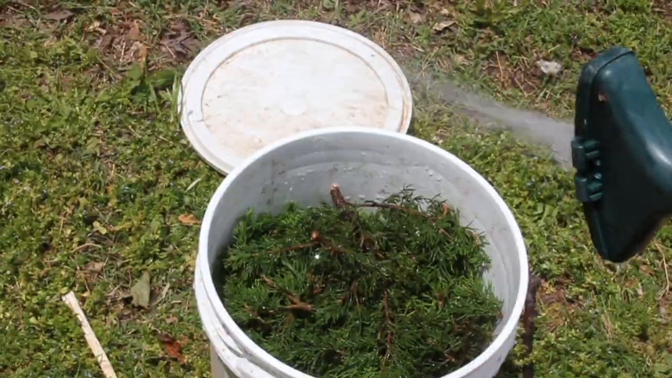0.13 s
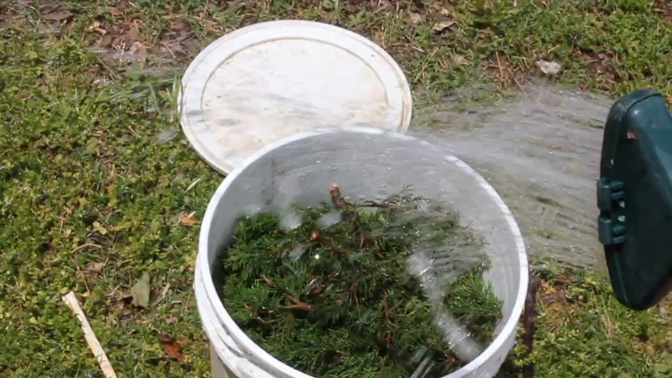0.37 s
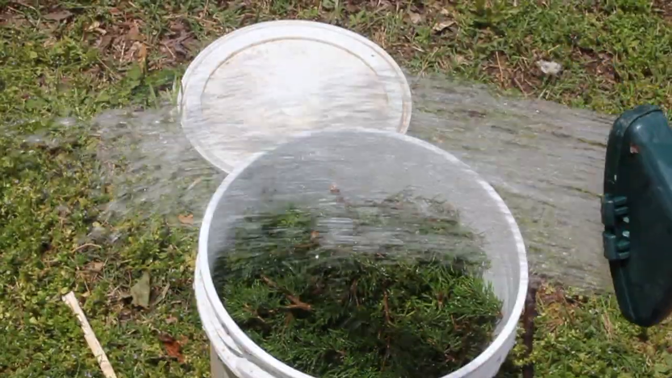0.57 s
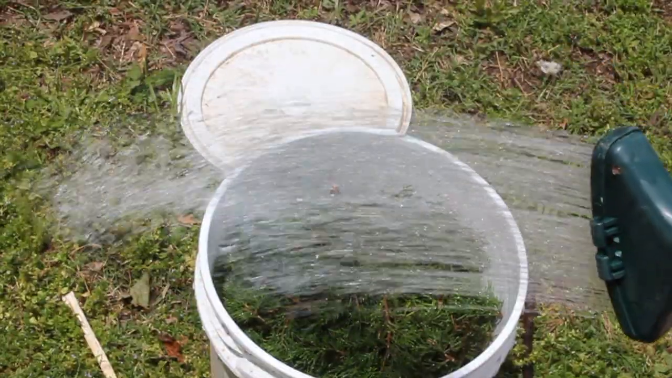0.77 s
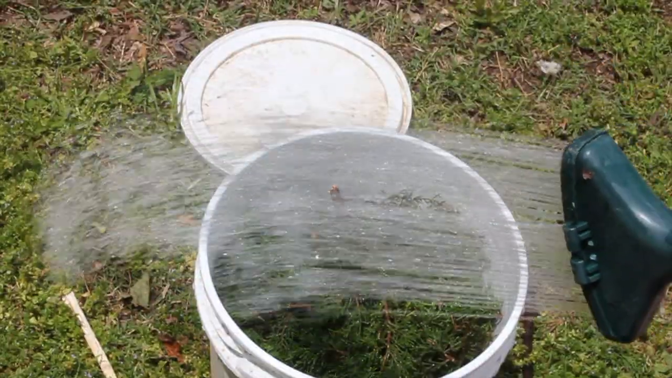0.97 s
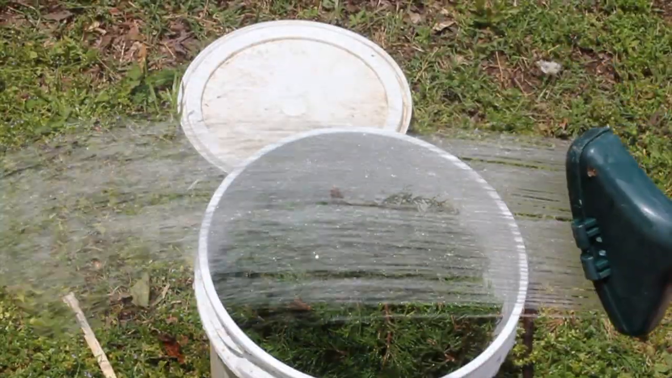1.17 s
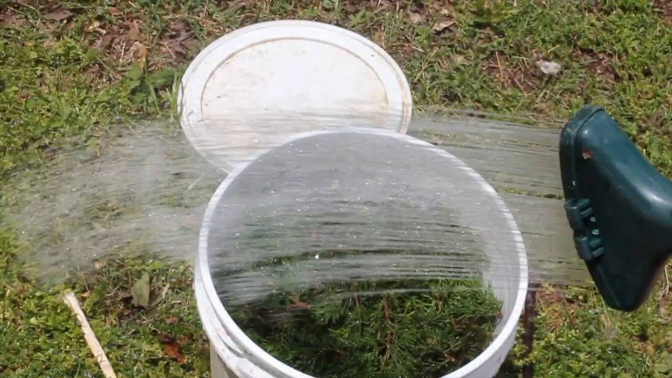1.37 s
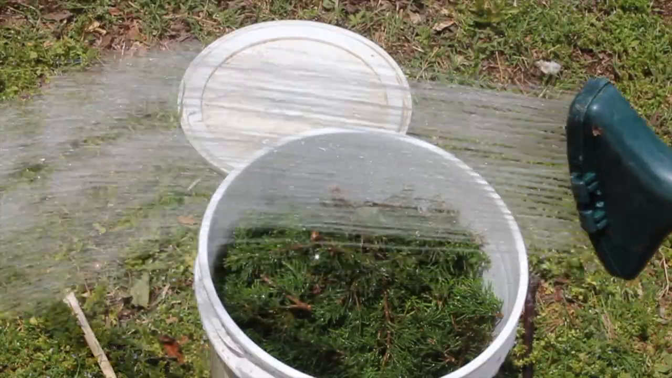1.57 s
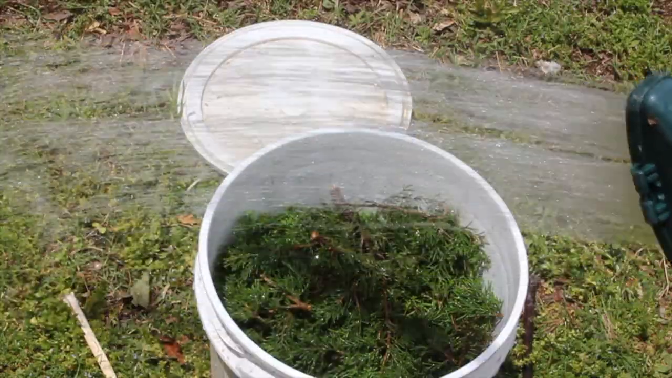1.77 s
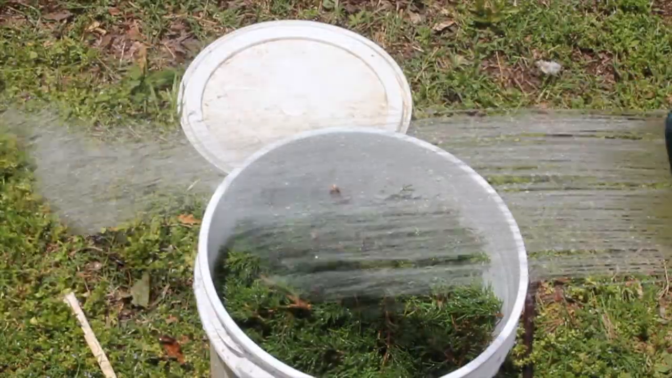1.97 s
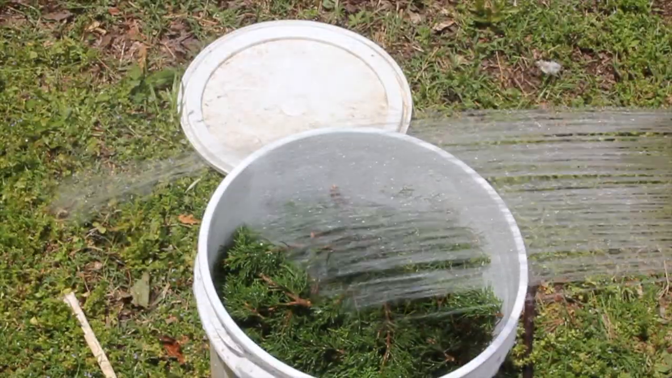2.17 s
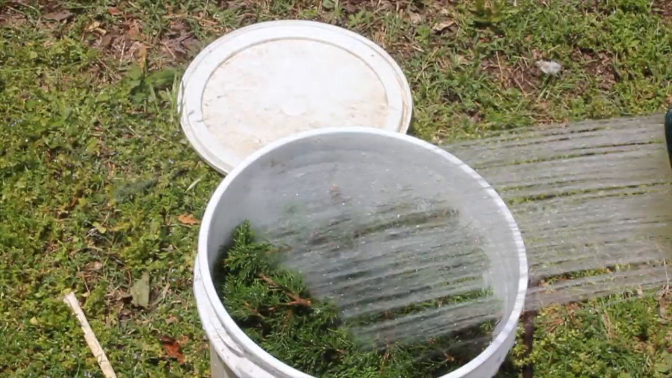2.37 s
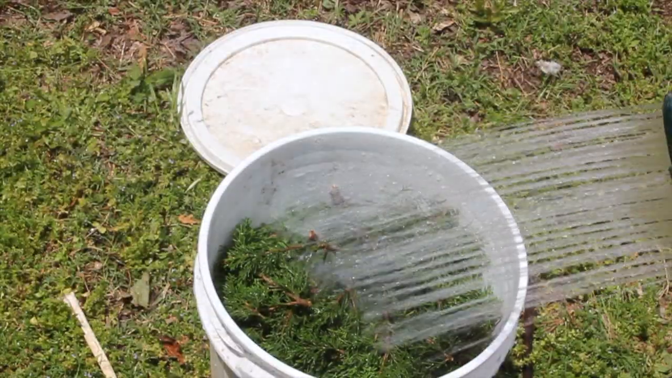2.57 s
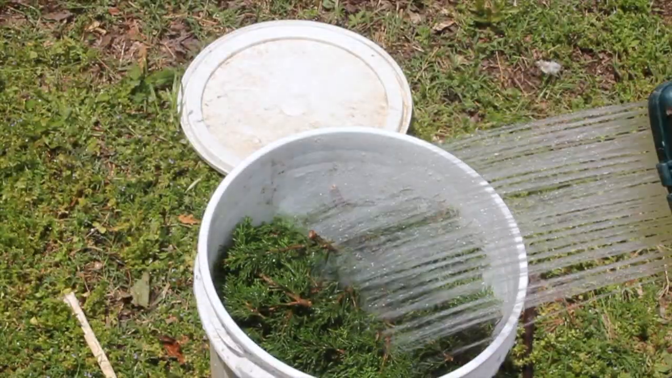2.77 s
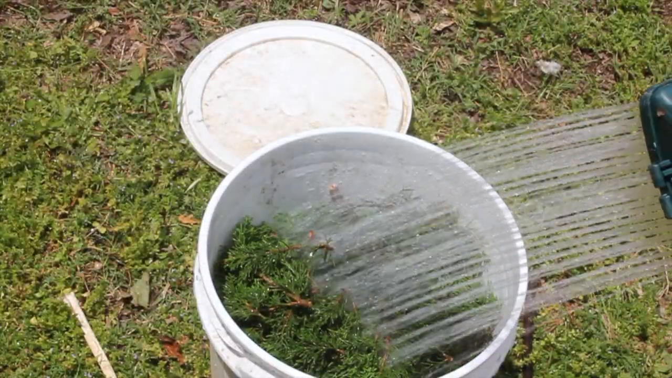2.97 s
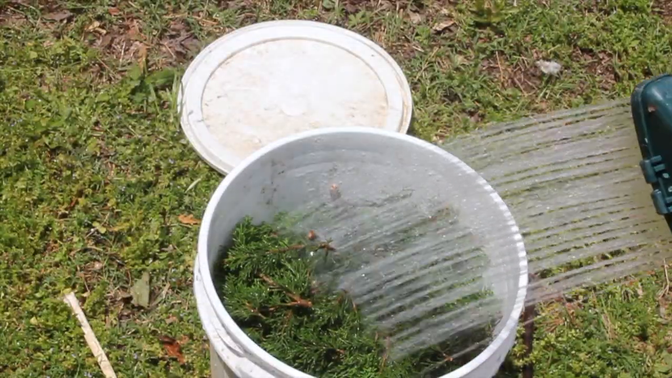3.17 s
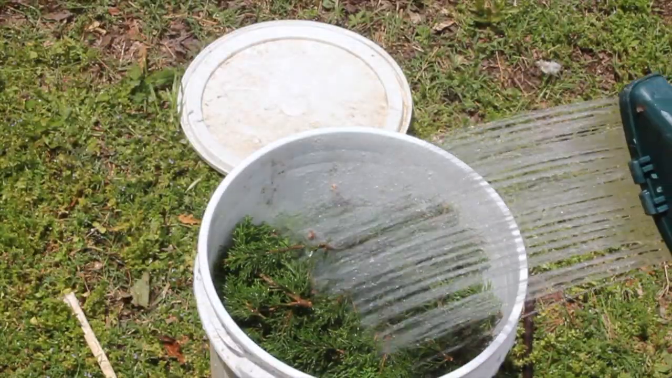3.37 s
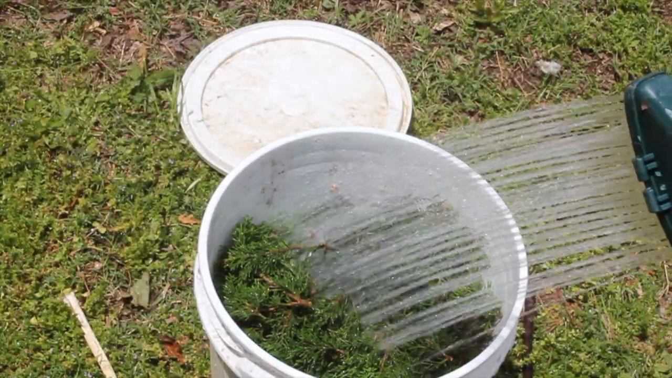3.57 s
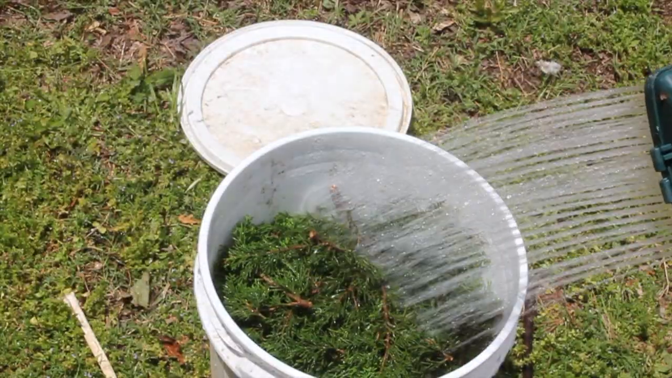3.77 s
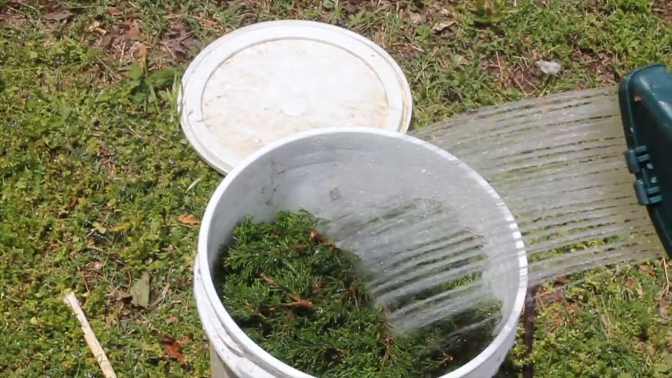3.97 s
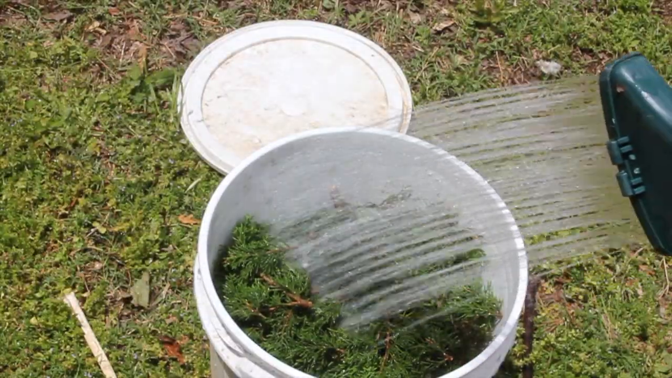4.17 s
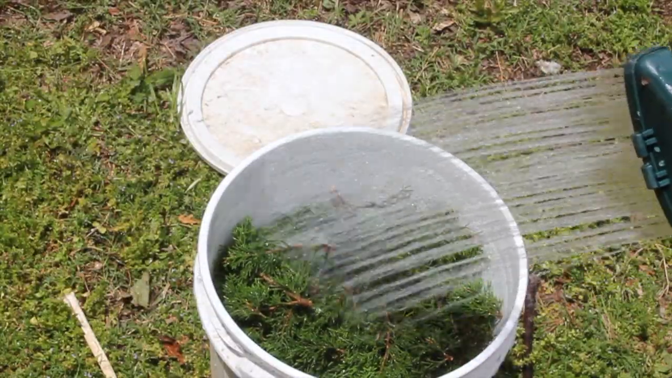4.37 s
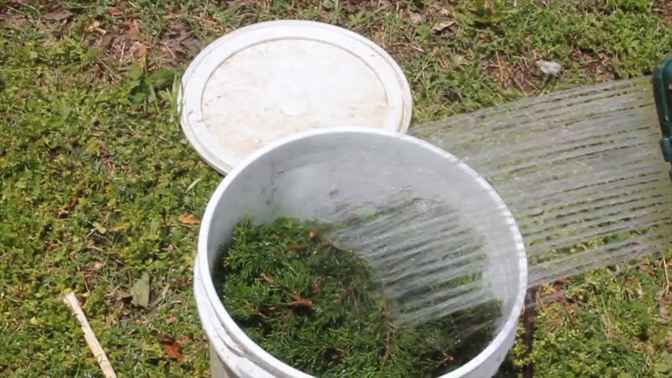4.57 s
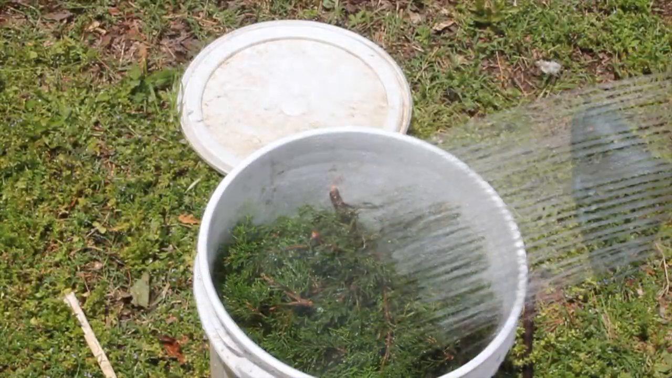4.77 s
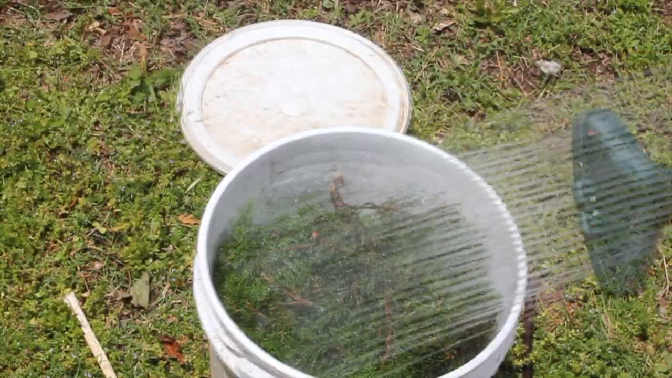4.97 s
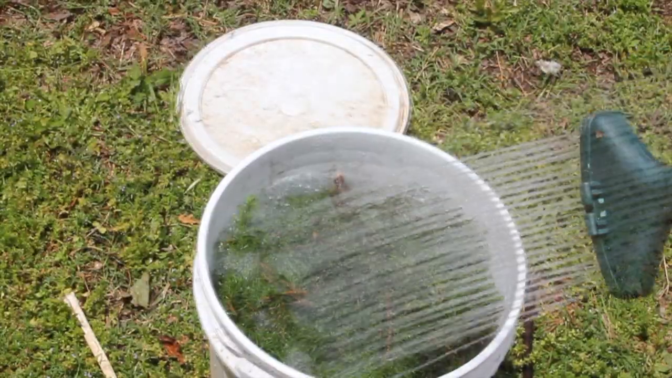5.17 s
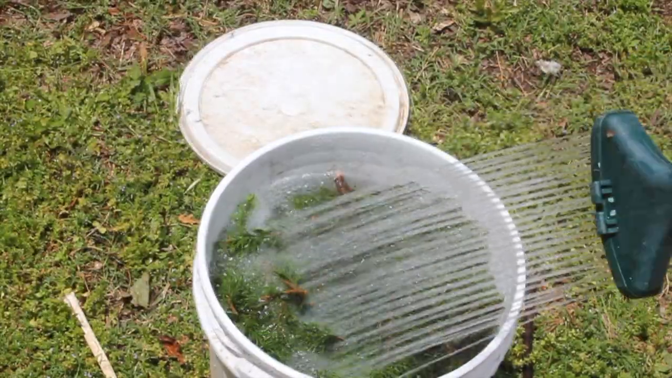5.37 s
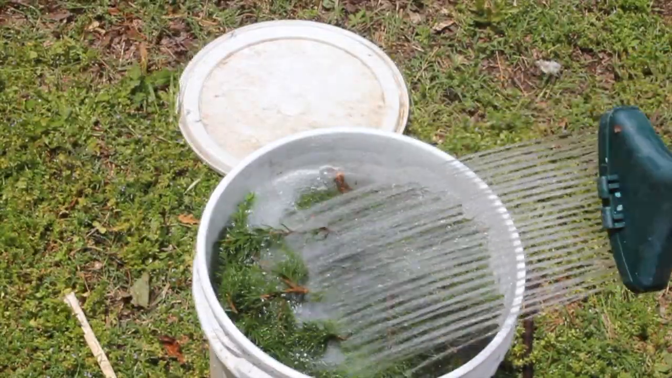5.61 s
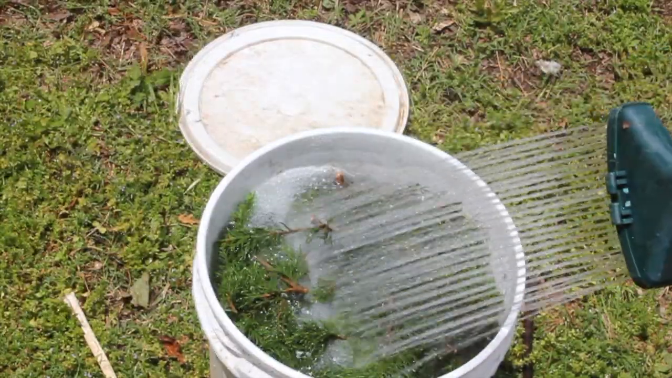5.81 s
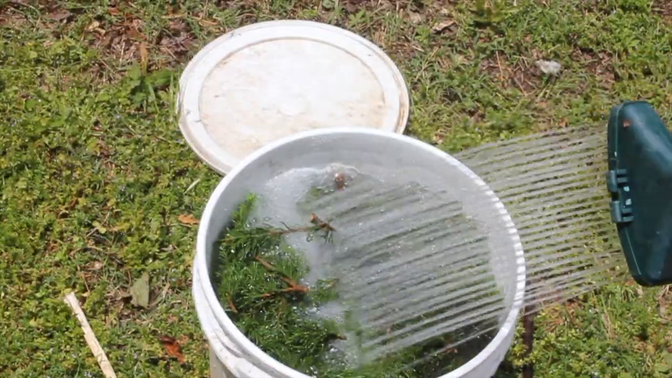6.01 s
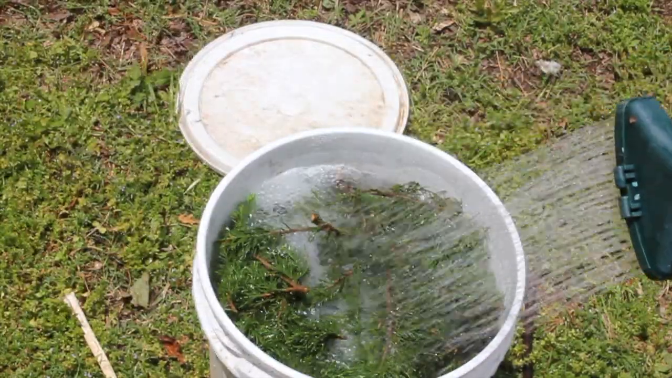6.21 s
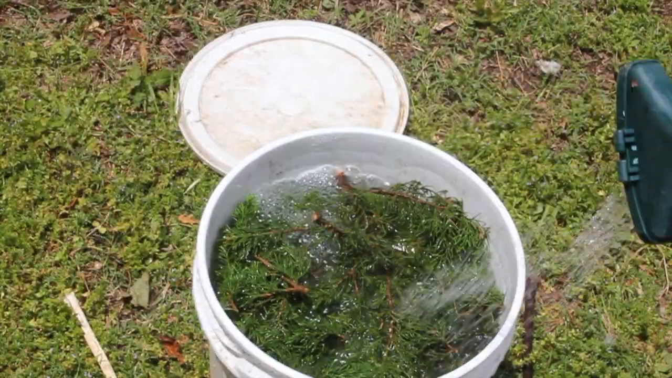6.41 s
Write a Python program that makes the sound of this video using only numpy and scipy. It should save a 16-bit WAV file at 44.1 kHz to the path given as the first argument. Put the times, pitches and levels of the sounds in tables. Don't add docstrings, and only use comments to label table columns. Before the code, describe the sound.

A hose nozzle spits open into a bright, sputtering shower that patters into a plastic bucket of leafy cuttings, then smooths and booms softly while filling.

```python
import sys
import numpy as np
from scipy import signal
from scipy.fft import rfft, irfft
from scipy.io import wavfile

SR = 44100
rng = np.random.default_rng(int(sys.argv[2]) if len(sys.argv) > 2 else 0)


def dump(signal):
    limited = np.clip(np.atleast_2d(signal).T, -1, 1)
    pcm = np.round(limited * 32767).astype(np.int16)
    wavfile.write(sys.argv[1], SR, pcm)


def gain_from_db(level_db):
    decades = np.asarray(level_db, float) / 20
    return 10 ** decades


N = 284312

# (time [s], level [dB])
SHOWER_FORCE = [(0.1, -23.5), (0.13, -30.5), (0.33, -25), (0.51, -24.5), (1.35, -26), (1.97, -30),
                (2.01, -26), (2.24, -20), (2.61, -29), (3.25, -30.5), (4.45, -23.5), (4.93, -31.5),
                (5.42, -24.5), (6.14, -27), (6.16, -24.5), (6.25, -34), (6.43, -37.5), (6.45, -45)]
# (time [s], level [dB])
TRAPPED_AIR = [(0.1, -33), (0.13, -27.5), (0.22, -33), (1.64, -29), (1.67, -32.5), (1.76, -29.5),
               (1.81, -32.5), (1.99, -40), (2.03, -34.5), (2.42, -31.5), (2.49, -37), (3.79, -37),
               (4.32, -34), (4.96, -36.5), (5.4, -32.5), (6.13, -34.5), (6.43, -40), (6.45, -47)]
# (time [s], level [dB])
AIM_AT_PLASTIC = [(0.1, -34), (0.13, -28.5), (0.2, -30), (1.25, -32), (1.88, -36), (2.2, -35.5),
                  (3.1, -38.5), (4.59, -37.5), (4.68, -38.5), (5.01, -38), (5.47, -34), (6.14, -31.5),
                  (6.23, -35), (6.45, -35)]
# (time [s], level [dB])
PLUNGE_IN_WATER = [(0.0, -31.5), (0.03, -34), (1.38, -35), (1.52, -36.5), (2.94, -34.5), (3.16, -38.5),
                   (4.15, -35), (4.87, -37.5), (5.22, -32.5), (6.27, -31.5), (6.28, -30), (6.45, -32.5)]

# (time [s], length [s], gain [dB], below 0 chokes and
AIR_CHOKES = [(0.327, 0.057, -5.5, 0.7), (0.912, 0.0088, -10, 0.5), (1.186, 0.0069, -11, 0.6),
              (1.379, .016, -11, .3), (1.448, 0.013, -10, .4), (1.474, 0.014, -10, .1),
              (1.527, .004, -7, .7), (1.547, .009, -10, .4), (1.66, 0.018, -13, .3),
              (1.68, 0.006, -16, 0.2), (1.703, .012, -5, 0.3), (1.791, 0.012, -16, 0.5),
              (1.816, 0.013, -11.5, 0.2), (1.839, 0.0063, -16, 0.2), (1.874, .01, -13, 0.45),
              (1.946, .016, -9, 0.4), (1.985, .02, -3, .8), (2.142, 0.017, -4, 0.3), (2.474, .016, -5, .1),
              (2.559, 0.0085, 10, 0.1), (2.666, 0.023, -7, 0.3), (3.99, 0.022, -2.5, .9),
              (1.714, 0.014, -4, .1), (0.587, 0.068, -4.5, 0.3), (1.42, .02, -3, .1),
              (4.073, 0.036, -2.5, 1), (4.7, .04, -6, 0), (2.002, .015, -7, .1), (2.378, .008, -6, .1),
              (1.216, .02, -2, .1), (1.132, .015, -4, .7), (5.005, .03, 0, .1), (2.74, .04, 0, .1),
              (6.25, .045, -2.5, .3)]
# (time [s], length [s], height [dB], share of air
WATER_BURSTS = [(0.388, 0.011, 4.5, 0.24), (0.984, 0.0062, 6, 0.9), (1.099, 0.03, 4, 0.5),
                (1.391, 0.015, 5.5, .6), (1.461, 0.011, 8, 0.67), (1.518, 0.014, 4, 1),
                (1.567, .013, 7.5, 0.63), (1.603, 0.022, 4.5, 0.8), (1.647, 0.01, 4, 1),
                (2.02, 0.0072, 11, 0.66), (1.758, 0.0075, 5, 0.4), (1.774, 0.016, 4, 0.47),
                (1.8, 0.0078, 9, 0.6), (1.855, 0.0078, 10, 0.65), (1.959, .011, 13, 0.7),
                (2.11, .017, 3.5, .5), (2.192, 0.008, 9, 0.43), (2.172, .01, 2.5, 1), (2.408, 0.013, 4, .8),
                (2.618, 0.011, 10, 0.8), (2.823, 0.0097, 11, 0.8), (2.855, 0.013, 7, 0.6),
                (2.903, .011, 9, 0.8), (3.02, .014, 5.5, 0.7), (3.132, .011, 2, 0.5),
                (3.367, 0.017, 12, 0.5), (3.435, 0.019, 7.5, 0.5), (3.775, .011, 7.5, 0.57),
                (4.216, 0.0089, 4, .4), (6.36, 0.016, 5, 0.3), (1.671, .004, -2, 0.4),
                (1.687, 0.011, 5.5, 0.43), (1.712, .005, 6, .7), (1.73, .012, 3.5, .5),
                (1.813, .004, 8, 0.9), (1.834, .006, 5, .4), (1.919, 0.013, 4, .3), (2.228, .012, 4, 0.8),
                (2.365, .011, 5.5, 0.45), (2.433, 0.0041, 6.5, 0.8), (2.484, .004, 5, .5),
                (3.47, .012, 4, .8)]
# (time [s], length [s], gain in drops [dB], gain in jet hiss [dB])
WRIST_SWINGS = [(.45, .06, -0.5, 1), (0.873, 0.14, 2.5, 4.5), (1.29, .1, -1, 2.5), (0.66, 0.13, -1.5, 4),
                (3.8, 0.1, -1, 1.5), (0.17, .06, 4.5, -3), (0.65, 0.069, 2.5, -3.5), (1.03, 0.085, 0, -4.5),
                (2.24, 0.27, -1.5, -2), (4.2, 0.12, 1, 0), (4.2, .12, 0.5, 0.5), (4.8, 0.11, 0.5, 3.5),
                (4.1, .06, -0.5, 1.5), (1.9, .14, 1, -2), (2.5, .08, 1, -2), (2.9, .06, 1, 2),
                (3.84, .06, -1, -6), (6.5, .1, 0.5, -2), (0.57, .1, -1, 0), (5.8, .15, 1.5, 1)]
# (time [s], length [s], gain in the hollow [dB], gain in the panels [dB])
RIM_CROSSINGS = [(.14, 0.057, -4, 1), (.27, 0.071, -4, 0), (5.5, .06, 4.5, -1), (5.75, 0.074, 2, 0.5),
                 (1.1, 0.035, 4.5, 0), (1.78, .05, 2, -3), (1.96, 0.058, 6, 4), (2.09, 0.074, 10, 2),
                 (2.3, 0.11, -2, 2), (.8, 0.14, -1, -0.5), (5.95, 0.093, -2.5, -2), (2.6, 0.69, -4.5, 1.1),
                 (4.0, 0.093, -1, 3), (4.8, 0.07, 3, -4), (5.2, .1, 3.5, 1), (6.4, 0.065, 4, -2)]
# (time [s], length [s], gain in foam [dB], gain in rattle [dB])
FOAM_WHIPS = [(.15, .06, 0, 1.5), (.62, .15, -1, 2), (1.1, 0.034, 1.5, 3), (1.6, .06, -9, -1),
              (1.74, .04, 0.5, 2.5), (1.9, 0.11, -2.5, -2), (2.1, 0.16, 0, -3), (2.24, 0.056, 1, -9),
              (3.44, .03, 3.5, -2), (4.18, .06, -1, -4), (4.7, .05, 1.5, 1), (5.0, .08, -1, -1),
              (5.42, .2, 0, -1.5), (6.12, 0.093, 2.5, 0.5)]
# (time [s], length [s], middle treble gain [dB], top gain [dB])
FAN_GLINTS = [(.05, .1, 4, -3), (.35, 0.072, -9, 2), (.55, .12, 0.5, 3), (.7, .15, -2.5, 3),
              (.85, .08, -2, -1), (.95, .08, 0.5, 0), (1.15, .06, 1, 0), (1.25, .08, 0, 0),
              (1.35, .08, 3, 0), (1.55, .1, 0, 0), (1.65, .06, 1, -2), (1.75, .1, -3, -3),
              (1.86, .08, -3, 0), (2.05, .08, 1.5, 0), (2.35, .1, 1, 0), (2.62, .12, 0, 2),
              (2.82, 0.13, 1.5, 1), (3.02, .16, -0.5, 2.5), (3.25, .08, 1, -1), (3.35, .08, 1.5, 1),
              (3.55, .08, 0, 3), (3.82, .1, 2.5, 3), (3.93, .08, 2, 3), (4.2, .1, 0.5, 0),
              (4.05, .08, -2, 0), (4.4, .2, 1.5, 0), (4.65, .08, 0, 1), (5.35, .12, 0, -1),
              (5.65, .1, 1.5, -2), (6.1, .2, 2.5, 1)]

# (pitch [Hz], level [dB])
PATTER_COLOUR = [(7000, -19), (8500, -2.5), (10000, -1), (12000, -1.5), (13200, 2), (14300, 3), (15800, -1)]
# (time [s], peak [dB], ring [Hz], decay [ms])
FAT_DROPS = [(.029, -44, 13000, .3), (.0983, -10, 4200, .3), (.9864, -2, 13300, .12),
             (1.857, -8, 8800, .08), (2.4228, 4, 12500, .09), (2.459, -9, 12000, .35),
             (3.0637, -4, 10200, .5), (3.2325, -14, 9500, .4), (3.493, -14, 12000, .3),
             (5.8336, -6, 10500, .25), (6.1623, -7, 10800, .3), (6.249, -18, 12500, .4),
             (6.2947, -16, 12300, .4), (6.301, -17, 7000, .4), (6.328, -21, 6000, .5),
             (6.418, -20, 12000, .3), (6.423, -19, 8500, .5)]
# (time [s], peak [dB], ring [Hz])
JET_CRACKLE = [(1.6408, -11, 4790), (1.7111, -15, 5250), (1.7298, -10, 6000), (1.752, -11, 4500),
               (1.798, -13, 4920), (1.8453, -13, 8700), (1.8563, -15, 8090), (1.8817, -18, 12600),
               (1.9585, -16, 4340), (1.985, -20, 12300), (2.006, -15, 10200), (2.0119, -13, 13500),
               (2.0538, -10, 12200)]
# (time [s], peak [dB], ring [Hz])
LAST_DRIBBLES = [
    (6.2796, -20, 3110),
    (6.2936, -17, 12500),
    (6.333, -22, 6190),
    (6.355, -24, 3010),
    (6.4168, -24, 8970),
]
# (time [s], peak [dB], ring [Hz])
AIR_SPITS = [(2.4813, -21, 6020), (2.5401, -16, 6520), (2.5835, -23, 6080), (2.593, -19, 4430),
             (2.617, -15, 6130), (2.7013, -21, 5590), (2.7561, -20, 4490), (2.7771, -23, 5740),
             (2.8115, -22, 6030), (2.819, -21, 4260), (2.8404, -19, 6380), (2.9008, -20, 5060),
             (3.0046, -20, 4280), (3.0619, -22, 5810), (3.1308, -14, 3260), (3.3618, -21, 3950),
             (3.4296, -22, 6200), (3.5848, -24, 5420), (3.7733, -19, 6180), (3.9739, -22, 5930),
             (4.0537, -20, 5460), (4.0891, -18, 3480), (4.132, -20, 6200), (4.1964, -16, 6380),
             (4.2143, -20, 5660), (4.2966, -23, 5920), (4.4807, -18, 4970), (4.5196, -12, 6530),
             (4.571, -23, 6400), (4.6079, -19, 5780)]
# (time [s], peak [dB], ring [Hz])
STRAY_DROPS = [(0.2094, -11, 12700), (0.2444, -12, 10600), (0.2794, -16, 12800), (0.5734, -13, 11700),
               (1.3394, -10, 12300), (2.1294, -8, 12300), (2.2158, -10, 6420), (2.2974, -8, 8220),
               (2.3394, -11, 13100), (4.5244, -14, 11400), (4.5436, -10, 12300), (4.5824, -8, 13000),
               (4.5994, -13, 9560), (4.7694, -18, 12400), (5.4094, -11, 6070)]
# (time [s], rms level [dB], ring [Hz])
WATER_SPLATS = [(0.105, -32, 2060), (0.14, -30, 1250), (0.165, -33, 1060), (0.22, -42, 950),
                (0.259, -33, 2580), (0.469, -31, 1850), (0.539, -31, 5020), (0.663, -41, 308),
                (0.668, -33, 950), (0.713, -25, 2060), (0.718, -35, 450), (0.783, -30, 2880),
                (0.883, -29, 1480), (0.933, -28, 3220), (1.117, -41, 440), (1.232, -42, 950),
                (1.247, -25, 5020), (1.322, -31, 1320), (1.332, -31, 2060), (1.566, -34, 2310),
                (1.616, -36, 2060), (1.621, -28, 7000), (1.631, -30, 3600), (1.985, -37.5, 760),
                (2.11, -39, 1650), (2.15, -38, 448), (2.17, -26, 3220), (2.305, -27.5, 4490),
                (2.325, -35, 1190), (2.754, -33, 4490), (3.193, -35, 2580), (3.422, -46, 280),
                (4.046, -43, 310), (4.131, -32, 5020), (4.185, -46, 280), (4.23, -39, 1650),
                (4.525, -29, 6260), (4.555, -35, 2060), (5.233, -38, 348), (5.263, -32, 4020),
                (5.502, -38.5, 350), (5.817, -32, 2060), (5.976, -37, 390), (2.3, -36, 1710),
                (2.4, -34, 1720), (0.75, -39, 760), (0.85, -35, 720), (1.27, -35, 760), (1.95, -42, 540),
                (2.05, -44, 560), (0.075, -42, 3800)]

# (pitch [Hz], width [Hz], level [dB])
WALL_MODES = [(151, 47, -3.5), (199.6, 18, -0.5), (233, 31, -8.5)]
# (pitch [Hz], width [Hz], level [dB])
HOLLOW_MODES = [(254, 70, 0), (387, 134, 0), (494, 142, -2)]
# (pitch [Hz], width [Hz], level [dB])
PANEL_MODES = [(693, 317, -6.5), (924, 135, -1), (1113, 287, -4)]
# (pitch [Hz], width [Hz], level [dB])
RIM_MODES = [(1530, 220, 2.5), (1710, 250, 4.5), (2130, 1200, 1.5)]
# (time [s], length [s], level [dB])
WALL_SINGING = [(.2, .15, -45), (2.08, .1, -43), (2.214, 0.19, -37.5), (2.5, 0.27, -44), (2.72, 0.25, -46),
                (3.147, 0.28, -66), (3.6, 0.38, -49), (4.0, .3, -47), (4.3, 0.38, -41), (5.9, .4, -61)]
# (time [s], length [s], level [dB], pitch [Hz])
BUCKET_GULPS = [(5.14, 0.045, -32, 198), (5.21, 0.056, -33, 181), (5.4, 0.042, -33, 191),
                (5.49, 0.047, -29.5, 189), (5.73, .05, -32.5, 200), (5.9, .07, -31, 168),
                (6.01, 0.075, -29.5, 164.4), (6.21, .04, -31, 174), (6.305, 0.051, -26, 183),
                (6.41, .04, -34.5, 184)]

# (frequency [Hz], level [dB per Hz])
RUMBLE_COLOUR = [(12, -68), (20, -41), (40, -16), (86, -12), (113, -7.5), (193, -6), (300, -7.5),
                 (390, -41)]
# (pitch [Hz], width [Hz], level [dB])
MOTOR_HARMONICS = [(47.7, 4.3, -55), (53.2, 3.1, -54), (94.7, 11.3, -44), (190.6, 8.1, -46),
                   (283.5, 12.4, -54.5), (382.6, 18, -62.5)]

# (mean [dB], share of force, of air, of aim, of plunge)
HISS_LAW = (-36, 0.39, 0.5, 0.5, 0.5)
RING_LAW = (-38.5, 0, 1.87, 0.27, 0)
PATTER_LAW = (-26.5, 1, 0, 0, 0)
FOAM_LAW = (-33, 0.5, 0.78, 0, 0.5)
THRUM_LAW = (-37, 0, 0, 0.03, 1.1)
SPLASH_LAW = (-44, 0, 0.5, 0.72, 1.1)
PANEL_LAW = (-40.5, 0.13, 0, 1.04, -0.17)
RIM_LAW = (-39, 0.38, 0, 1.06, -0.33)


def rms_one(x):
    return x / np.sqrt(np.mean(x ** 2) + 1e-20)


def in_time(rows):
    times, *columns = np.transpose(rows)
    return [np.interp(np.arange(N) / SR, times, column) for column in columns]


def drift(rate):
    r = np.exp(-40 * np.pi * rate / SR)
    slow = signal.lfilter([1], [1, -2 * r, r * r], rng.standard_normal(N // 20 + 2002))[2000:]
    return np.interp(np.arange(N) / 20, np.arange(len(slow)), rms_one(slow))


def bump(s, length, front=1):
    out = np.zeros(N)
    near = np.arange(max(int((s - 2 * length) * SR), 0), min(int((s + 2 * length) * SR), N))
    late = (near / SR - s) / length + (1 - front) / 2
    out[near] = np.exp(-(1.8 * late / np.where(late < 0, front, 2 - front)) ** 2)
    return out


def swells(rows, front=1):
    return sum(np.outer(gains_db, bump(s, length, front)) for s, length, *gains_db in rows)


def band(x, low_hz, high_hz, order=2):
    edges = [low_hz, min(high_hz, 0.45 * SR)]
    return signal.sosfilt(signal.butter(order, edges, "band", fs=SR, output="sos"), x)


def resonance(x, hz, width_hz):
    r = np.exp(-np.pi * width_hz / SR)
    feedback = [1, -2 * r * np.cos(2 * np.pi * hz / SR), r * r]
    return signal.lfilter(np.array([1, 0, -1]) * (1 - r * r) / 2, feedback, x + 1e-18)


def body(x, modes):
    return sum((-1) ** k * gain_from_db(db) * resonance(x, hz, width) for k, (hz, width, db) in enumerate(modes))


def impacts(per_s, spread_db):
    sizes = gain_from_db(spread_db * np.minimum(rng.exponential(1, N), 6)) * rng.choice([-1, 1], N)
    landed = rng.random(N) < per_s / SR
    return rms_one(sizes * landed / np.sqrt(per_s))


def droplets(pitches_hz, gains_db, per_s, spread_db, sharpness):
    hits = impacts(per_s, spread_db)
    dealt = rng.integers(0, len(pitches_hz), N)
    total = np.zeros(N)
    for k, (hz, db) in enumerate(zip(pitches_hz, gains_db)):
        total += gain_from_db(db) * rms_one(resonance(hits * (dealt == k), hz, hz / sharpness))
    return rms_one(total)


def valve():
    cracks_s, opens_s, snap_s = 0.052, 0.1, 0.0043
    times = [cracks_s - snap_s, cracks_s, opens_s - snap_s, opens_s]
    return np.interp(np.arange(N) / SR, times, [-28, -16.5, -6.5, 0])


def flow():
    shared = 0.72 * drift(51) + 0.76 * drift(200)
    flutter = np.array([1.05 * shared + 0.57 * drift(50), shared + 0.27 * drift(40), 0.31 * shared])
    flutter = flutter * np.interp(np.arange(N) / SR, [3.5, 4.9], [1.3, 0.4])
    flutter = flutter * (1 - 0.55 * bump(2.0, 0.9))
    choke_share, burst_share = (0.66, 0.89, 0.84), (2.27, 1.5, 0.52)
    chokes = [(s, length, *(db * np.multiply(choke_share, [1, 1, felt])))
              for s, length, db, felt in AIR_CHOKES]
    bursts = [(s, length, *(db * np.multiply(burst_share, [1 - air, air, 1 - air])))
              for s, length, db, air in WATER_BURSTS]
    return flutter + swells(chokes) + swells(bursts, front=0.65)


def chamber_pitch():
    dry_rise = 900 * np.exp(-np.arange(N) / SR / 0.12)
    return np.clip(4430 + dry_rise + 120 * drift(4.7), 3700, 5500)


def nozzle(hiss_db, ring_db, centre_hz):
    jet = impacts(per_s=14000, spread_db=4.0)
    chamber = np.zeros(N)
    for hz in np.geomspace(3600, 5600, 9):
        share = np.exp(-(np.log(centre_hz / hz) / 0.06) ** 2)
        chamber += share * resonance(resonance(jet, hz, 950), hz, 950)
    ring = rms_one(chamber) + gain_from_db(-5) * rms_one(resonance(jet, 9030, 1200))
    hiss = rms_one(band(impacts(per_s=12000, spread_db=3.0), 2180, 4110, order=3))
    return gain_from_db(hiss_db) * hiss + gain_from_db(ring_db) * ring


def patter(level_db, flow_db):
    pitches = np.geomspace(7000, 16500, 14)
    gains = np.interp(pitches, *np.transpose(PATTER_COLOUR))
    density = np.clip(gain_from_db(level_db + 25), 0.3, 1.5)
    fine = droplets(pitches, gains, per_s=18000 * density, spread_db=3.0, sharpness=3.3)
    large = droplets(pitches[::2], gains[::2], per_s=250, spread_db=2, sharpness=6)
    return gain_from_db(level_db + 1.06 * flow_db + 0.48 * drift(70)) * (fine + gain_from_db(-16.5) * large)


def glint(x):
    def above(hz):
        return signal.sosfiltfilt(signal.butter(3, hz, "high", fs=SR, output="sos"), x)

    middle_db, top_db = swells(FAN_GLINTS)
    top, upper = above(11400), above(7000)
    return x - upper + gain_from_db(middle_db) * (upper - top) + gain_from_db(top_db) * top


def fizz(level_db, flow_db):
    pitches = np.geomspace(5200, 7400, 9)
    pops = droplets(pitches, np.linspace(2.5, -2.5, 9), per_s=9000, spread_db=3.5, sharpness=6)
    return gain_from_db(level_db + 0.24 + 0.7 * flow_db) * pops


def bucket(thrum_db, splash_db, drum_db, rattle_db, flow_db):
    thrum = rms_one(band(body(rng.standard_normal(N + SR), WALL_MODES), 104, 245)[SR:])
    splash = rms_one(band(body(impacts(per_s=2700, spread_db=2.5), HOLLOW_MODES), 227, 580))
    hits = impacts(per_s=6000, spread_db=2.5)
    drum = rms_one(band(body(hits, PANEL_MODES), 376, 1510))
    rattle = rms_one(band(body(hits, RIM_MODES), 1377, 2050))
    low = gain_from_db(thrum_db - 0.5) * thrum + gain_from_db(splash_db) * splash
    return low + gain_from_db(drum_db + 0.31 * flow_db) * drum + gain_from_db(rattle_db + 0.71 * flow_db) * rattle


def single_drops():
    small = [(s, db + 1, hz, 0.71) for s, db, hz in JET_CRACKLE + LAST_DRIBBLES + AIR_SPITS]
    strays = [(s, db + 3.5, hz, 0.22) for s, db, hz in STRAY_DROPS]
    out = np.zeros(N)
    t = np.arange(int(0.004 * SR)) / SR
    for s, db, hz, decay_ms in FAT_DROPS + small + strays:
        ring = np.sin(2 * np.pi * hz * t) + 0.22 * np.sin(0.9 * np.pi * hz * t)
        tick = ring * np.exp(-1000 * t / decay_ms)
        at = round(s * SR)
        out[at:at + len(t)] += gain_from_db(db) * tick / np.abs(tick).max()
    return band(out, 3000, 19000)


def splats():
    shortest_s, longest_s = 0.014, 0.06
    out = np.zeros(N)
    noise = rng.standard_normal((len(WATER_SPLATS), int(4 * longest_s * SR) + 1))
    for (s, db, hz), row in zip(WATER_SPLATS, noise):
        length = np.clip(30 / hz, shortest_s, longest_s)
        near = np.arange(int((s - 2 * length) * SR), int((s + 2 * length) * SR))[:len(row)]
        width = hz / 5.3
        slap = rms_one(resonance(resonance(row[:len(near)], hz, width), hz, width))
        out[near] += gain_from_db(db - 1) * slap * bump(s, length)[near]
    return out


def far_wall():
    sing_hz, width_hz, waver_hz = 1560, 75, 45
    hits = impacts(per_s=5000, spread_db=1.5)
    place = drift(5.0)
    tone = np.zeros(N)
    for k in (-1, 0, 1):
        ring = resonance(resonance(hits, sing_hz + k * waver_hz, width_hz), sing_hz, 3 * width_hz)
        tone += np.exp(-(place - k) ** 2) * ring
    return rms_one(tone) * sum(gain_from_db(db) * bump(s, length) for s, length, db in WALL_SINGING)


def gulps():
    t = np.arange(N) / SR
    booms = np.zeros(N)
    for s, length, db, hz in BUCKET_GULPS:
        booms += gain_from_db(db) * bump(s, length) * np.sin(2 * np.pi * hz * (t - s))
    return booms * np.sqrt(2)


def leaves():
    return gain_from_db(-54.5) * rms_one(band(rng.standard_normal(N), 1500, 5500))


def outdoors(level_db):
    white = rng.standard_normal(N + SR)
    hz = np.maximum(np.arange(len(white) // 2 + 1) * SR / len(white), 1)
    colour_hz, colour_db = np.transpose(RUMBLE_COLOUR)
    colour = gain_from_db(np.interp(np.log(hz), np.log(colour_hz), colour_db))
    far = irfft(rfft(white) * colour)[:N]
    throb = rng.standard_normal(N + SR)
    motor = sum(gain_from_db(db) * rms_one(resonance(resonance(throb, f, width), f, width)[SR:])
                for f, width, db in MOTOR_HARMONICS)
    return gain_from_db(level_db) * rms_one(band(far, 52, 146)) + motor


def scene():
    controls = (SHOWER_FORCE, TRAPPED_AIR, AIM_AT_PLASTIC, PLUNGE_IN_WATER)
    moves = np.array([curve - curve.mean() for rows in controls for curve in in_time(rows)])
    opening_db = valve()

    def level(law, valve_share=0):
        return law[0] + np.dot(law[1:], moves) + valve_share * opening_db

    low_db, mid_db, high_db = flow()
    drops_db, jet_db = swells(WRIST_SWINGS)
    hollow_db, panel_db = swells(RIM_CROSSINGS)
    foam_db, rake_db = swells(FOAM_WHIPS)

    hiss_db = level(HISS_LAW, 0.89) + jet_db + low_db
    ring_db = level(RING_LAW, 0.97) + mid_db
    mono = nozzle(hiss_db, ring_db, chamber_pitch())
    mono = mono + glint(patter(level(PATTER_LAW, 1.4) + drops_db, high_db))
    mono = mono + fizz(level(FOAM_LAW, 1.2) + foam_db + 0.7 * drops_db, (mid_db + high_db) / 2)
    drum_db = level(PANEL_LAW, 0.052) + panel_db
    rattle_db = level(RIM_LAW, 0.33) + rake_db
    mono = mono + bucket(level(THRUM_LAW), level(SPLASH_LAW) + hollow_db, drum_db, rattle_db, low_db)
    mono = mono + single_drops() + splats() + far_wall() + gulps() + leaves()
    mono = mono + outdoors(-39 + 0.81 * moves[-1])
    return np.array([mono, mono])


def band_limit(x):
    return signal.sosfilt(signal.butter(12, 16770, fs=SR, output="sos"), x)


def record(dry):
    steep = signal.ellip(16, 0.3, 75, 15750, fs=SR, output="sos")
    mix = signal.sosfilt(steep, dry)
    return band_limit(mix)


dry = scene()
out = record(dry)
dump(out)
```